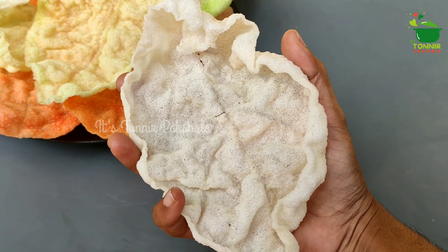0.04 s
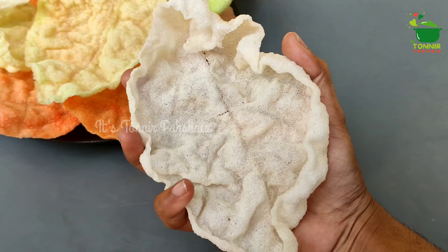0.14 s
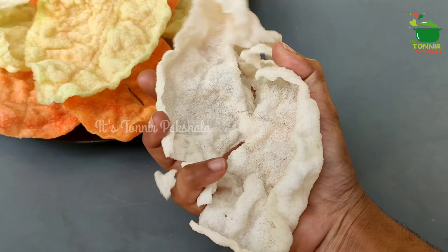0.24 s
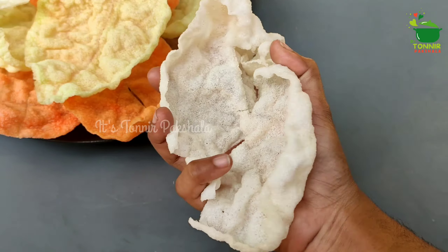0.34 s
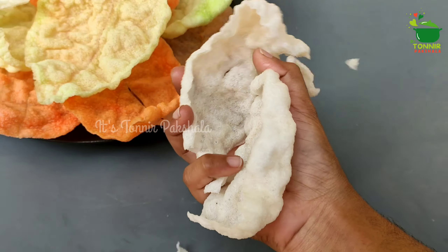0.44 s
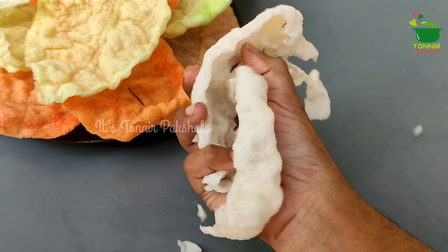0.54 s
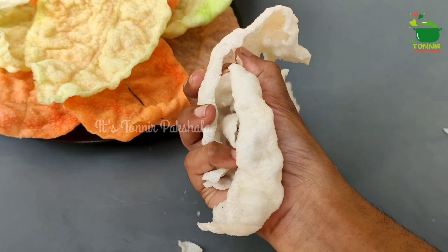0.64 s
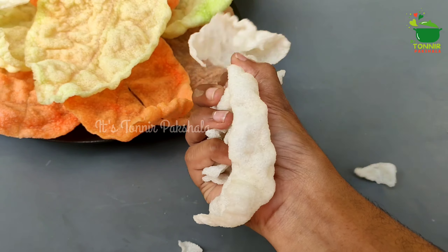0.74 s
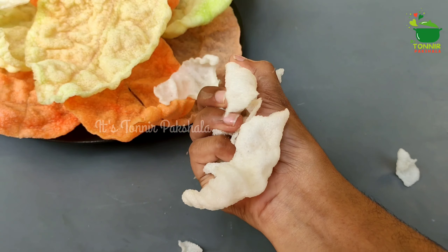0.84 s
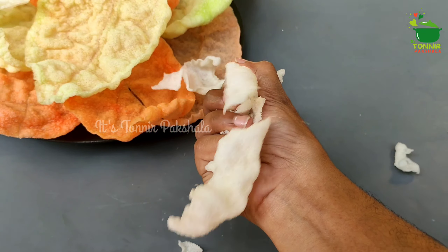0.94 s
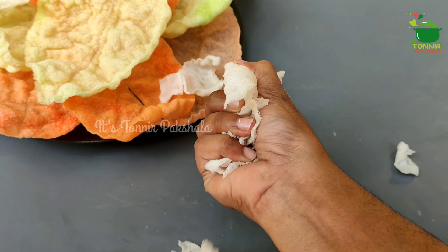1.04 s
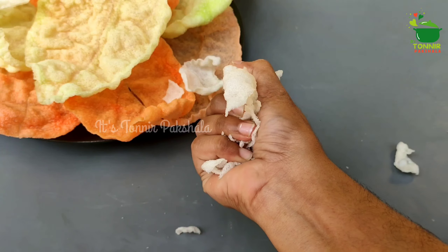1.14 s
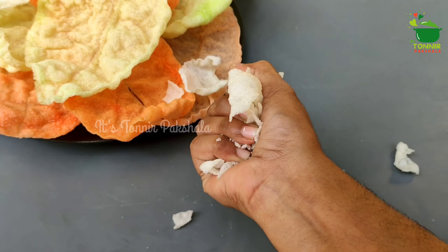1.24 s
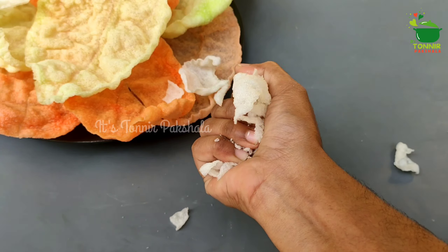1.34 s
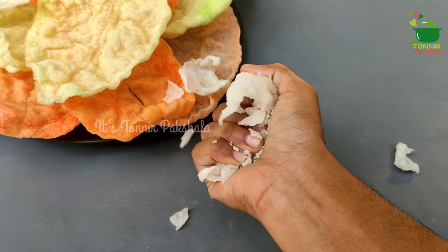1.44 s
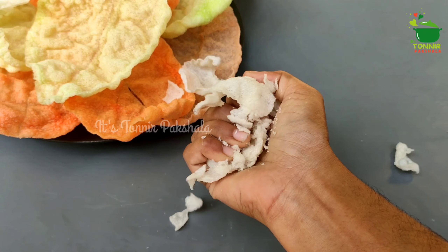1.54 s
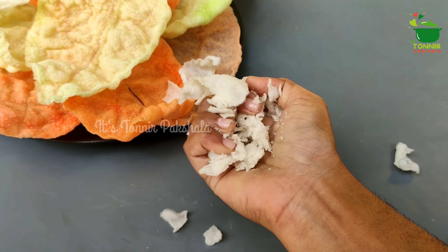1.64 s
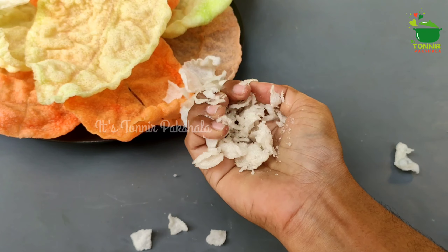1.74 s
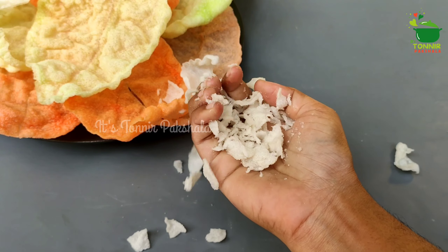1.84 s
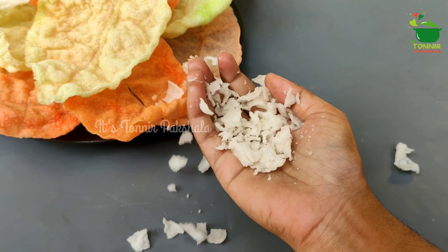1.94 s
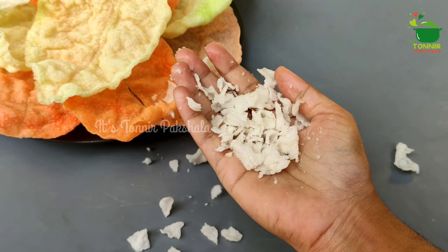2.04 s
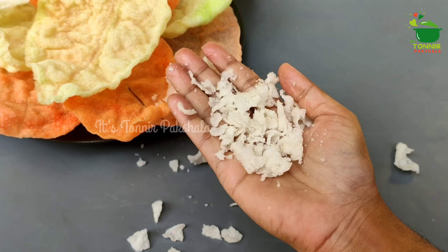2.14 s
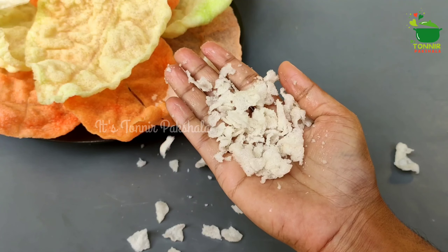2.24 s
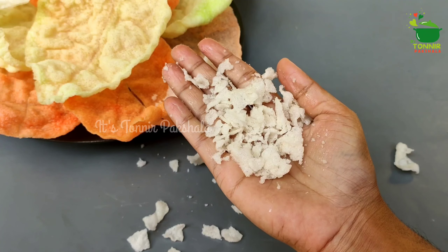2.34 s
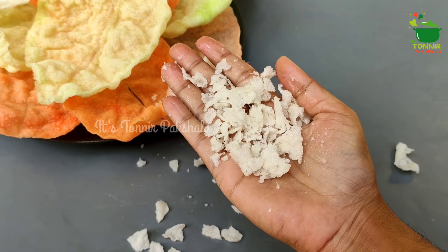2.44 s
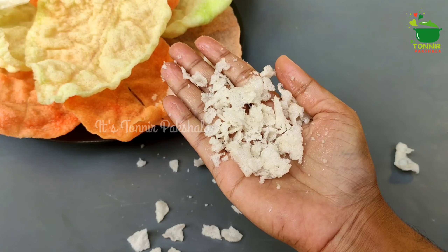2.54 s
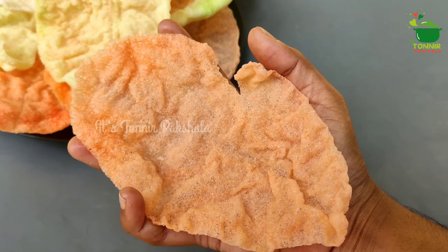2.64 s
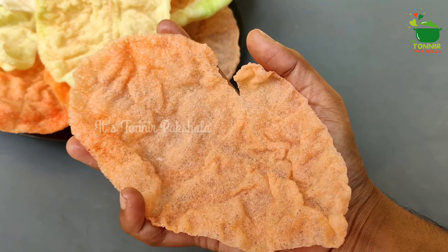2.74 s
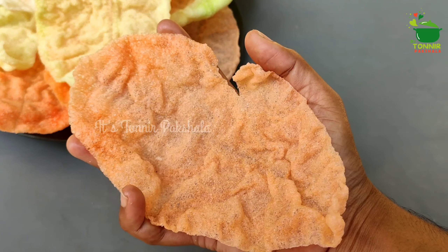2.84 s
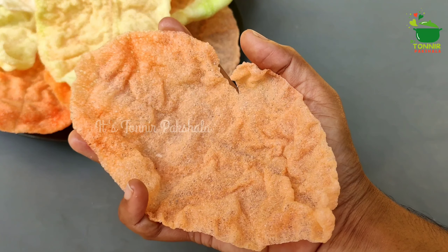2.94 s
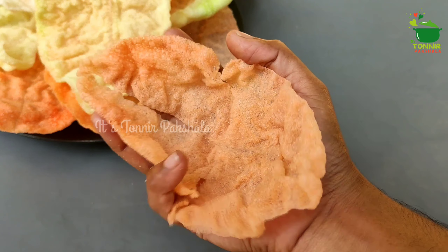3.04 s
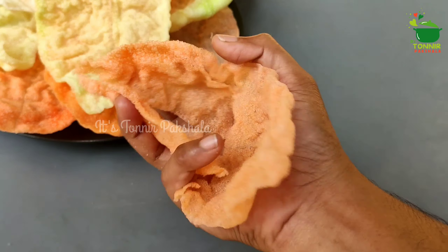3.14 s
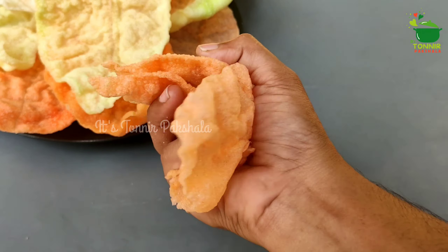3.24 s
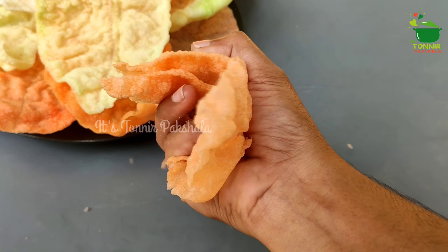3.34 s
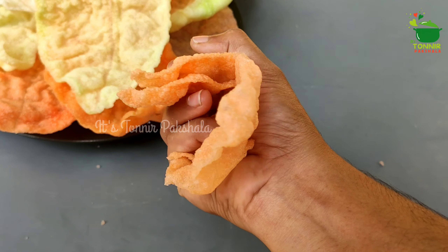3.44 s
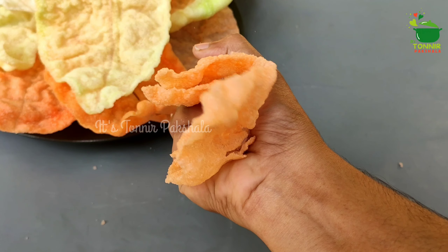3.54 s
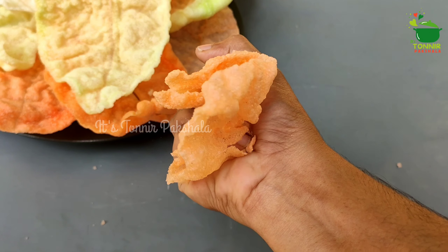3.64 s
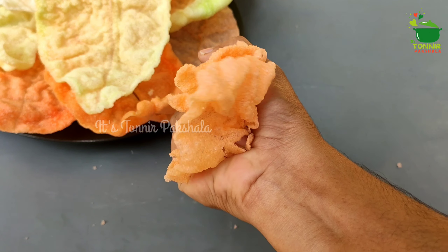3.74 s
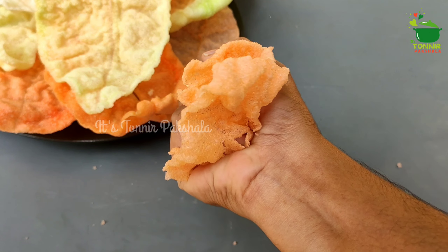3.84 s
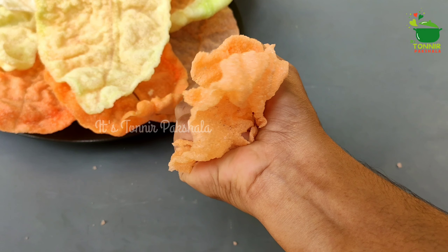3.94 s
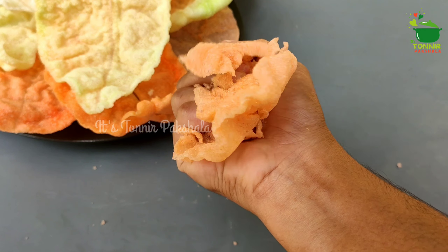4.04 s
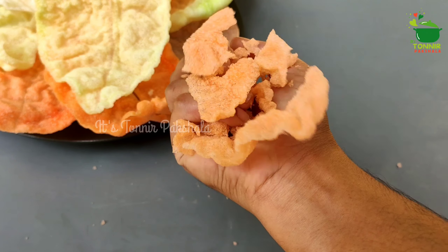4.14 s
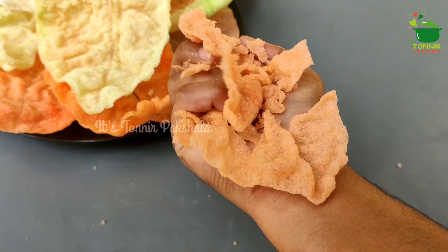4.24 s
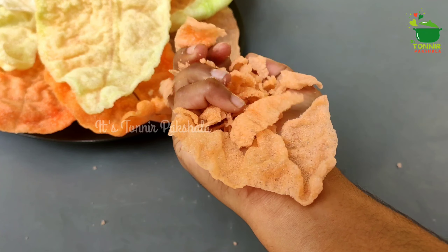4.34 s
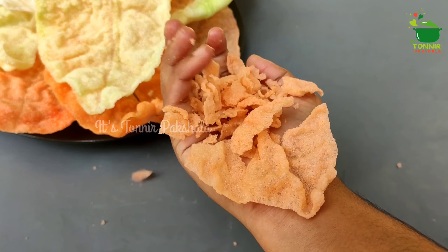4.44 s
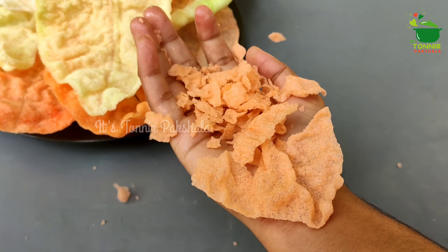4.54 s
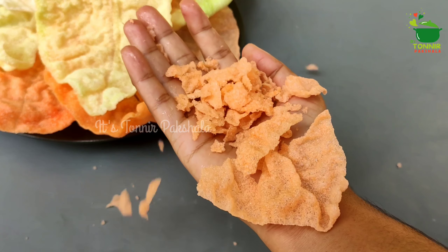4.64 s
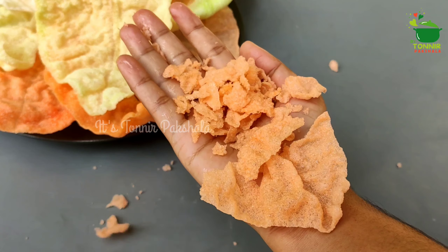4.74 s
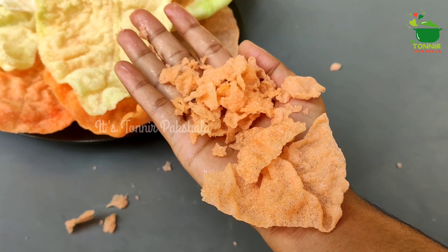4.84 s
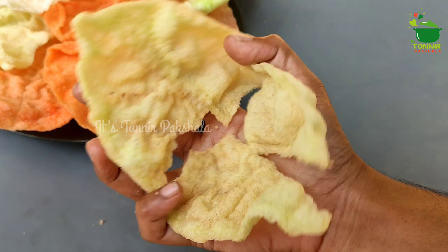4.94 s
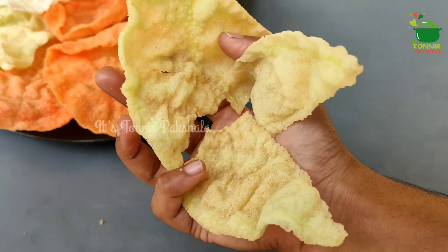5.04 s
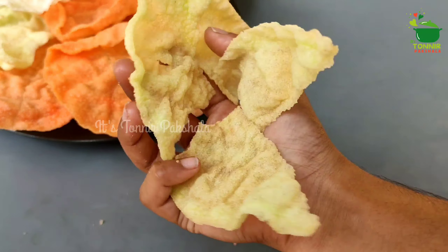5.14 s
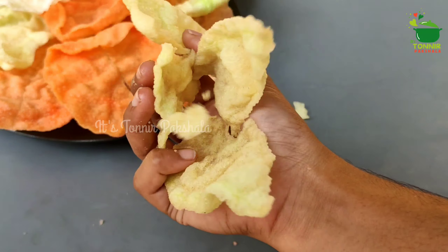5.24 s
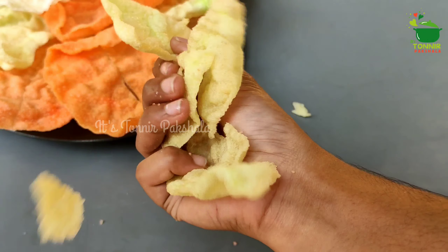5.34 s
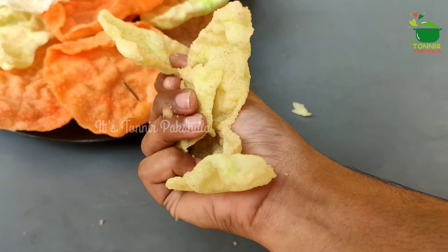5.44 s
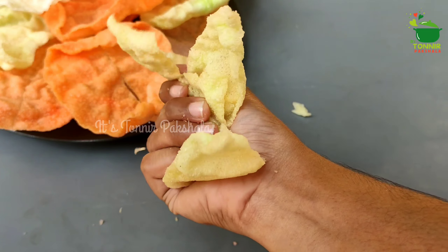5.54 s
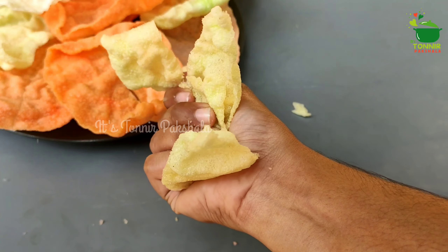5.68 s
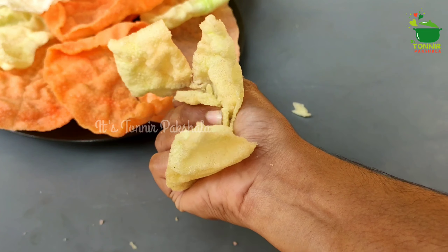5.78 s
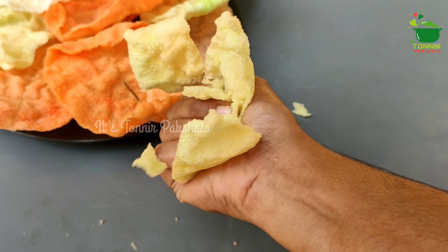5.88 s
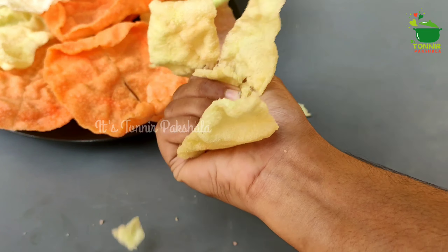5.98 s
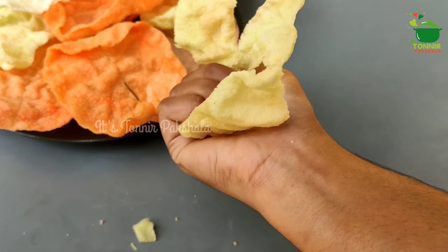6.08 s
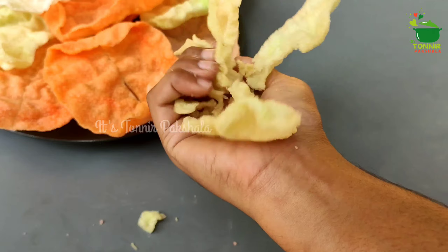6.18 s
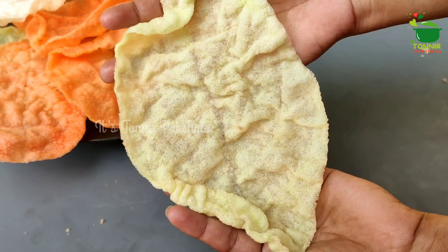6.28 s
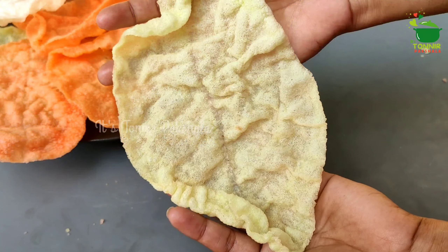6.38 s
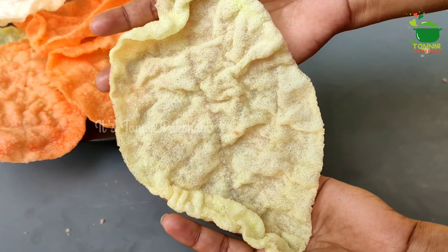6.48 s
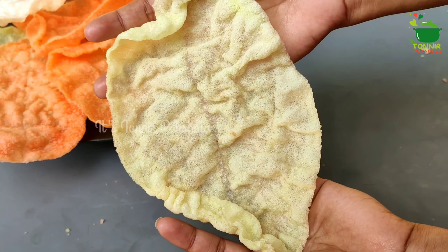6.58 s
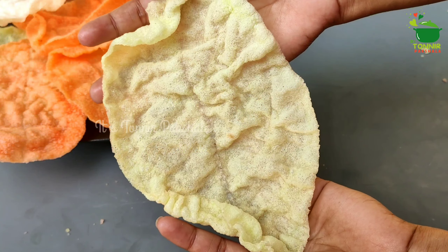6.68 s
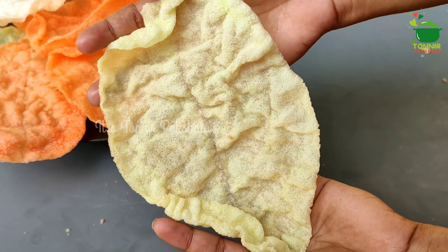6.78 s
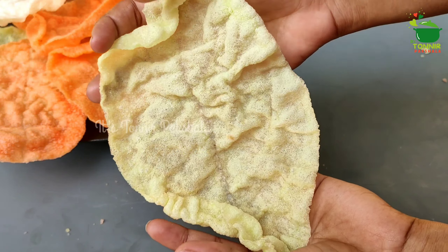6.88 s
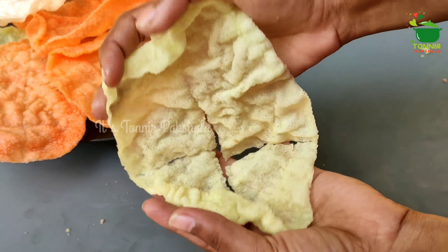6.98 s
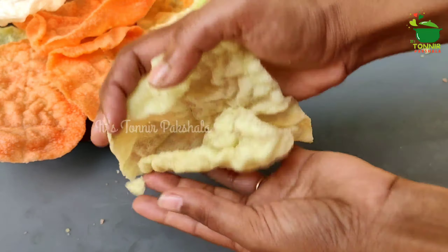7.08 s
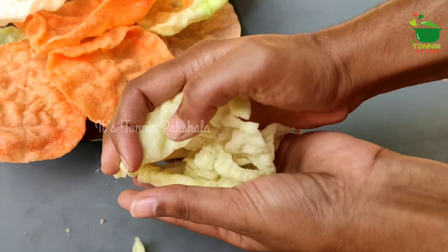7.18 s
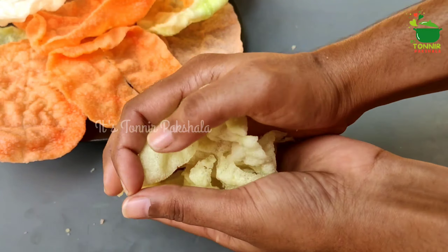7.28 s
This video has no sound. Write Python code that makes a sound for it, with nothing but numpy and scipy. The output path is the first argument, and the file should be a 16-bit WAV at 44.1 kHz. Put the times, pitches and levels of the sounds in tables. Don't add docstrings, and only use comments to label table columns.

```python
import sys
import numpy as np
from scipy import signal
from scipy.fft import rfft, irfft, next_fast_len
from scipy.io import wavfile
from scipy.ndimage import uniform_filter1d, map_coordinates

SR = 44100
rng = np.random.default_rng(int(sys.argv[2]) if len(sys.argv) > 2 else 0)


def decibels_to_gain(level_db):
    exponent = np.asarray(level_db, float) / 20
    return 10 ** exponent


def persist_wave(psi):
    counts = np.round(np.clip(psi, -1, 1) * 32767).astype(np.int16)
    wavfile.write(sys.argv[1], SR, np.atleast_2d(counts).T)


N = 322503

# frequency in Hz, density in dB per Hz.
CRISP = [(80, -8.5), (170, -22), (340, -8), (660, -3.5), (1700, -2), (6200, -2), (6900, -5), (7500, -11.5),
         (14000, -24.5), (16000, -34.5)]


def evened(x):
    return x / np.sqrt(np.mean(x ** 2) + 1e-20)


def read(points, hz):
    f, value = np.transpose(points)
    return np.interp(np.log(hz + 1), np.log(f + 1), value)


def add(mix, s, sound):
    part = mix[:, round(s * SR):][:, :sound.shape[1]]
    part += sound[:, :part.shape[1]]


def causal(points):
    hz = abs(np.fft.fftfreq(4096, 1 / SR))
    log_gain = np.log(decibels_to_gain(np.maximum(read(points, hz), -100)))
    return np.fft.ifft(np.exp(np.conj(signal.hilbert(log_gain)))).real[:2048]


def hiss(points, same):
    size = next_fast_len(N, real=True)
    hz = np.fft.rfftfreq(size, 1 / SR)
    a, b = rfft(rng.standard_normal((2, size)))
    like = np.clip(read(same, hz), -1, 1)
    ports = np.array([a, like * a + np.sqrt(1 - like ** 2) * b])
    return evened(irfft(ports * decibels_to_gain(read(points, hz)), size)[:, :N])


def thirds(x):
    body_hz, top_hz = 1300, 8000
    size = next_fast_len(x.shape[-1], real=True)
    hz, z = np.fft.rfftfreq(size, 1 / SR), rfft(x, size)
    low = 1 / (1 + (hz / body_hz) ** 6)
    high = 1 - 1 / (1 + (hz / top_hz) ** 10)
    thin = 1 - 1 / (1 + (hz / 130) ** 4)
    parts = [irfft(z * share, size)[..., :x.shape[-1]] for share in (low * thin, 1 - low - high, high)]
    return [p / (np.linalg.norm(p, axis=-1, keepdims=True) + 1e-12) for p in parts]


def background():
    # frequency in Hz, density in dB per Hz.
    hush = [(15, -28), (25, -3.5), (114, -8.5), (145, -9), (200, -8.5), (263, -6.5), (420, -7.5),
            (760, -9.5), (1020, -11), (13600, -25), (16000, -24.5)]
    # frequency in Hz, left-right likeness from 0 to 1.
    hush_same = [(40, 0.92), (240, 0.94), (950, 0.11), (15000, 0)]
    # frequency in Hz, density in dB per Hz.
    rumble_colour = [(9, -26), (15, 8.5), (44, -7.5), (85, -19), (390, -20), (800, -40)]
    # time in seconds, level in dB.
    rumble_level = [(0, -58), (1.1, -53), (2.335, -57)]
    at = np.arange(N) / SR
    rumble_db = np.interp(at, *np.transpose(rumble_level), right=-140)
    rumble = hiss(rumble_colour, [(20, .95), (600, .7)])
    cut = rumble_level[-1][0]
    push = decibels_to_gain(-40) * np.exp(np.minimum(at - cut, 0) / .05) * (at < cut)
    hush_db = -64.5 - 3 * np.clip(at - 4, 0, 1)
    return decibels_to_gain(hush_db) * hiss(hush, hush_same) + decibels_to_gain(rumble_db) * rumble + push


def crow():
    # time in seconds, level in dB.
    caws = [
        [(1.6, -63), (1.75, -61), (1.9, -71)],
        [(2.12, -69), (2.37, -59.5), (2.56, -72)],
        [(5.92, -63), (6.1, -60), (6.26, -68)],
        [(6.49, -65), (6.7, -62.5), (6.82, -69)],
    ]
    # frequency in Hz, bandwidth in Hz, level in dB.
    throat = [(935, 45, 0), (1070, 60, -5), (1220, 80, -10)]
    at = np.arange(N) / SR
    turning_points = [s for rows in caws for s in (rows[0][0], rows[-1][0])]
    opening = np.interp(at, turning_points, [.985, 1.03] * len(caws))
    voice = np.zeros((2, N))
    for hz, width, db in throat:
        a, b = signal.lfilter(*signal.butter(2, width / SR), rng.standard_normal((2, 2, N)))
        carrier = np.exp(2j * np.pi * np.cumsum(hz * opening) / SR)
        voice += decibels_to_gain(db) * evened(((a + 1j * b) * carrier).real)
    level = sum(decibels_to_gain(np.interp(at, *np.transpose(rows), left=-140, right=-140)) for rows in caws)
    rasp = decibels_to_gain(2.2 * evened(uniform_filter1d(rng.standard_normal(N), 900)) - 1.5)
    return voice * rasp * uniform_filter1d(level, 900)


def kitchen_reverb(x):
    # frequency in Hz, t60 in seconds.
    decay = [(300, 0.18), (12000, 0.02)]
    taps = np.zeros((2, SR // 2))
    at = np.arange(200, SR // 2 - 20, 20) + rng.integers(0, 20, (2, (SR // 2 - 201) // 20))
    np.put_along_axis(taps, at, rng.choice([-1., 1.], at.shape), 1)
    hz, t, z = signal.stft(taps, SR, nperseg=256)
    tail = signal.istft(z * decibels_to_gain(-60 * t / read(decay, hz)[:, None]), SR, nperseg=256)[1]
    return signal.fftconvolve(x, tail / np.linalg.norm(tail[0]), axes=1)[:, :N]


def drops():
    # start in seconds, peak level in dB.
    landings = [(1.4246, -35), (1.433, -21), (1.4353, -22.5), (1.439, -27), (1.4608, -30), (1.473, -42),
                (1.524, -36), (1.553, -43), (1.577, -36.5), (1.605, -41), (1.629, -43.5), (1.646, -47.5),
                (1.964, -49.5), (1.997, -41.5), (2.032, -46.5), (2.316, -43.5), (4.836, -50)]
    # frequency in Hz, level in dB, t60 in seconds.
    piece = [(278, -3, .1), (340, -6, .07), (430, -3, .05), (495, -2, .055), (570, -5, .04),
             (690, -4, .035), (840, -3, .03), (980, -1, .025), (1800, -14, .015)]
    t, out = np.arange(6000) / SR, np.zeros((2, N))
    hz, db, t60 = np.transpose(piece)[..., None]
    no_bass = signal.butter(4, 245, "high", fs=SR, output="sos")
    draws = rng.random((len(landings), 2, len(piece), 1))
    for (s, peak_db), (weight, detune) in zip(landings, draws):
        swing = np.sin(-2 * np.pi * hz * (1 + 0.15 * (detune - .5)) * t)
        ring = ((.5 + weight) * decibels_to_gain(db - 60 * t / t60) * swing).sum(0)
        ring = signal.sosfilt(no_bass, ring)
        add(out, s, decibels_to_gain(peak_db) * ring / abs(ring).max() * np.ones((2, 1)))
    return out


def ticks():
    # start in seconds, level in dB, ring in Hz, left-right difference in dB.
    early = [(0.1903, -33, 2130, -3), (0.2535, -44.5, 6370.0, 8), (0.2875, -22, 6760.0, 4.5),
             (0.307, -11.3, 6840, 5), (0.3334, -18, 6140, 0.5), (0.4312, -49, 6500.0, 2.4),
             (0.5877, -24.5, 6030.0, 5), (0.6642, -25, 4390.0, 5), (0.6848, -34, 1810.0, -3),
             (0.7226, -27, 2200.0, 2.5), (0.8018, -30, 3420, -1.5), (0.8204, -39, 6240.0, -0.5),
             (0.8391, -34, 6230, -3), (0.9063, -28, 2200.0, -1.3), (0.932, -25.5, 6740, 12),
             (0.9398, -22.5, 4480.0, 4), (0.9662, -26.5, 4330, 0.7), (0.9765, -29, 4530, 6),
             (1.0285, -22.5, 4950.0, -3), (1.1209, -32.3, 4400, 3), (1.1366, -49, 7450.0, 2.8),
             (1.142, -36, 7200, -2), (1.1817, -34.5, 4080, -3), (1.2403, -39.5, 5600, 0.8),
             (1.2516, -28.5, 1720, 0), (1.2627, -42, 5250.0, 2.5), (1.2928, -43.5, 4520.0, 3),
             (1.3617, -48, 4050.0, -2.5), (1.3802, -45, 1520, -2), (1.4859, -34.5, 1210.0, 3),
             (1.4924, -35, 1840, -1), (1.5006, -34, 1810.0, -0.5), (1.5584, -33.5, 4330, 5),
             (1.6263, -38.5, 6500, -7), (1.6872, -45, 4520.0, 1), (1.7906, -49, 3100.0, -0.5),
             (1.8262, -54, 3490.0, -0.5), (1.857, -53, 6630.0, -1.1), (1.8969, -45, 5300, 1.8),
             (1.9061, -52, 6100, 0.6), (1.9722, -49.5, 3750, -3), (1.9851, -46, 5170, 3),
             (1.996, -41.5, 7160, -3), (2.0268, -45, 3700.0, -7), (2.0521, -50, 4910.0, 1),
             (2.0962, -50, 3340, -4.0), (2.0998, -48, 4310.0, -1.7)]
    middle = [(3.0784, -27.5, 5970, 3.5), (3.1902, -19.5, 3250, -8), (3.2372, -28, 4820.0, -4),
              (3.289, -21, 6800, 3), (3.36, -23.5, 3900, 10.5), (3.4588, -27, 3620, 2),
              (3.4996, -45, 5700, 2), (3.599, -22.5, 6680.0, 12), (3.6454, -22, 6740, 3),
              (3.669, -28, 1700, 3), (3.6903, -36, 6590.0, 7), (3.709, -40, 1750, 0),
              (3.7377, -36, 6000, 1), (3.819, -27.5, 6850, 11), (3.8478, -33, 1750, 0.7),
              (3.856, -31, 6800, 5), (3.872, -32, 6500, 7), (3.919, -39, 6600, 2.5), (3.9757, -37, 5330, 2),
              (4.563, -41, 1680.0, -2), (4.5725, -45, 3530.0, -0.5), (4.5863, -49, 3520, -1.8),
              (4.8218, -36, 3800, -6)]
    more_ticks = [(4.9862, -49, 2070.0, -8), (5.1051, -48, 2710.0, 1.7), (5.1471, -46, 5250.0, -1.5),
                  (5.2538, -46, 3700, -0.4), (5.269, -30.5, 6340, 2.1), (5.3265, -42, 5210.0, 7),
                  (5.342, -29, 5650, -1), (5.3566, -35, 5900.0, 1.6), (5.3788, -36, 6200, 0.4),
                  (5.391, -38.0, 3450.0, -7), (5.431, -35, 7240.0, 2.5), (5.4632, -20.5, 4580, -8.5),
                  (5.5, -29, 5000, -6), (5.548, -37.5, 5100, 5), (5.5803, -27.5, 3480, 2.0),
                  (5.63, -27, 2280.0, 7), (5.6351, -30, 1650, 0), (5.662, -28.5, 4390.0, -11),
                  (5.6746, -36, 5040.0, 4), (5.7386, -25.5, 6540, 6), (5.7656, -26, 6370.0, -6),
                  (5.8088, -26, 5800, -0.6), (5.8388, -26.5, 7000, 1.3), (5.877, -34, 6540, -0.5),
                  (5.902, -40, 5380.0, -1), (5.9052, -41, 6240.0, 3.3), (5.9307, -44.5, 3100, -3),
                  (5.937, -45, 3400, -0.5), (5.944, -41, 6100, 2), (5.959, -38, 5170, 2), (6.0303, -44, 3300, -9),
                  (6.15, -45, 4330, 0.8), (7.0587, -25, 6330, 0), (7.089, -15, 4130, 5), (7.1152, -21, 6330, 7.1),
                  (7.1212, -22, 5070, -5), (7.1868, -23.5, 6100, 1), (7.2281, -13, 5800, -3),
                  (7.28, -19, 6400, 0),
                  (5.344, -26.5, 2930, 6), (5.3425, -20.5, 9880, -4), (1.4252, -26.5, 3400, -2),
                (0.7645, -21, 2330, -1), (0.779, -22, 2100, -0.5), (5.289, -25, 1510, -1),
                (0.75, -19.5, 5500, 0), (1.4345, -22, 900, -1), (5.021, -16.5, 2600, 2),
                (5.031, -17, 3200, 0), (7.073, -17, 1100, -0.5)]
    rise_ms, fall_ms, spread, click_db = 0.44, 1, 0.262, -9.5
    ms, out = np.arange(-60, 340) * 1000 / SR, np.zeros((2, N))
    shape = np.where(ms < 0, np.exp(-(ms / rise_ms) ** 2), np.exp(-ms / fall_ms))
    rows, colour = early + middle + more_ticks, causal(CRISP)[:200]
    far_port = np.array([0, 1])[:, None, None]
    for (s, level_db, hz, pan_db), draw in zip(rows, rng.standard_normal((len(rows), 2, 406))):
        near_hz = hz * (1 + spread * np.array([[-1], [0], [1]]) * abs(draw[0, :3, None]))
        unlike = hz / (hz + 1500)
        phase = 2 * draw[0, 3:6, None] + unlike * draw[1, 3:6, None] * far_port
        modes = np.sin(2 * np.pi * near_hz * ms / 1000 + phase)
        ring = (np.array([[.5], [1], [.5]]) * modes).sum(1)
        click = signal.fftconvolve(draw[:, 6:] + draw[:1, 6:], colour[None], "same", axes=1)
        sound = (evened(ring) + decibels_to_gain(click_db) * evened(click)) * shape
        sound -= shape * sound.sum(axis=1, keepdims=True) / shape.sum()
        add(out, s + ms[0] / 1000, decibels_to_gain(level_db - 3.5 + pan_db * np.array([[.5], [-.5]])) * sound)
    return out


def flakes(count, cycles=84.0, longest=0.012, snap=0.28, unlike_hz=1500, lag=4.02):
    t, draw = np.arange(600)[:, None] / SR, rng.random((count, 5, 1, 32))
    hz = 120 + 15800 * ((np.arange(32) + draw[:, 0]) / 32) ** 1.5
    t60 = np.minimum(cycles / hz, longest)
    height = np.sqrt(hz ** 0.7 / t60) * draw[:, 1]
    unlike = hz / (hz + unlike_hz)
    phase = 2 * np.pi * (hz * t + draw[:, 2])
    left = np.sin(phase - 2 * np.pi * hz * lag / SR)
    right = np.sin(phase + 7.65 * unlike * (draw[:, 3] - .5)) * (1 + 2 * unlike * (draw[:, 4] - .5))
    rings = (np.stack([left, right], 1) * (height * decibels_to_gain(-60 * t / t60))[:, None]).sum(-1)
    rings *= np.minimum(t[:, 0] / 0.00029, 1)
    rings /= np.linalg.norm(rings, axis=(1, 2), keepdims=True)
    rings[np.arange(count), 0, rng.integers(5, 11, count)] += snap
    rings[:, 1, 4] += snap
    return signal.oaconvolve(rings, causal(CRISP)[None, None], axes=2)[..., :1200]


def fractures(shape, per_s, spread_db):
    size = decibels_to_gain(spread_db * np.minimum(rng.exponential(1, shape), 4)) * rng.choice([-1, 1], shape)
    return size * (rng.random(shape) < per_s / SR)


def grind():
    # time in seconds, level in dB.
    pressure = [
        [(0.0, -86), (0.27, -50.5), (0.41, -52.5), (0.6, -39.5), (1.15, -45.5), (1.6, -48), (1.8, -57),
         (2.3, -64), (2.6, -68.5)],
        [(2.75, -65.5), (2.85, -52.5), (3.0, -61), (3.22, -42.5), (3.4, -46.5), (3.55, -50), (3.9, -46.5),
         (4.15, -63.5), (4.55, -53)],
        [(4.95, -64), (5.1, -55), (5.2, -61.5), (5.32, -47), (5.5, -49.5), (5.7, -45), (5.97, -56.5),
         (6.0, -57), (6.24, -58.5), (6.3, -68), (6.37, -68), (6.39, -62), (6.45, -76)],
        [(7.01, -83), (7.1, -55), (7.3, -43)],
    ]
    rings, pick = flakes(count=16, cycles=110.0), rng.integers(0, 16, N)
    clumps = decibels_to_gain(1.9 * evened(uniform_filter1d(rng.standard_normal(N), 500)))
    level_db = np.interp(np.arange(N) / SR, *np.concatenate(pressure).T)
    ticking = np.clip((level_db + 70) / 8, 1.5, 2.2)
    slips = fractures(N, 5000, 1.8) * clumps + ticking * fractures(N, 60, 2.5)
    turns = decibels_to_gain(5 * rng.standard_normal((16, 400)))
    turns /= np.sqrt((turns ** 2).mean(0))
    turns = map_coordinates(turns, [pick, np.arange(N) * 399 / N], order=1)
    sound = np.zeros((2, N))
    for k, ring in enumerate(rings):
        sound += signal.oaconvolve((slips * turns * (pick == k))[None], ring, axes=1)[:, :N]
    z = rfft(sound)
    colour = decibels_to_gain(read(CRISP, np.fft.rfftfreq(N, 1 / SR)))
    even = colour / np.sqrt(uniform_filter1d(abs(z) ** 2, size=2500))
    body, middle, top = thirds(irfft(z * even, N))
    body_db = -15.0 - 0.05 * (level_db + 58)
    top_db = -8.5 + 0.29 * (level_db + 51.5)
    return decibels_to_gain(level_db) * np.sqrt(N) * (middle + decibels_to_gain(body_db) * body + decibels_to_gain(top_db) * top)


def breaks(rows, rings, size, count, per_s, crack):
    ms, out = (np.arange(2 * size) - size) * 1000 / SR, np.zeros((2, N))
    s, level_db, body_db, spread_ms, top_db = np.transpose(rows)[..., None, None]
    slips = fractures((len(rows), count, 2 * size), per_s, 2.2)
    slips[:, 0, size] = crack
    spread_ms = np.maximum(spread_ms, .4)
    lopsided = np.where(ms < 0, 1.3, .75)
    volleys = slips * np.exp(-(ms / (2 * lopsided * spread_ms)) ** 2)
    heard = rings[rng.integers(0, len(rings), (len(rows), count))]
    body, middle, top = thirds(signal.fftconvolve(volleys[:, :, None], heard, axes=3).sum(1))
    energy = np.sqrt(2 * np.pi) * spread_ms * SR / 1000
    sounds = decibels_to_gain(level_db) * np.sqrt(energy) * (middle + decibels_to_gain(body_db) * body + decibels_to_gain(top_db) * top)
    for start, sound in zip(s.ravel(), sounds):
        add(out, start - .0003 - size / SR, sound)
    return out


def with_top(tables, top_db):
    wafer_top_db = [-0.23, -0.28, 0.99, 0.86]
    rows = np.concatenate(tables)
    brittle_db = np.repeat(wafer_top_db, [len(table) for table in tables])
    lighter_db = -0.12 * (rows[:, 1] + 30) - 0.098 * (rows[:, 2] + 15)
    scatter_db = 2 * rng.standard_normal(len(rows))
    return np.c_[rows, top_db + brittle_db + lighter_db + scatter_db]


def wafers():
    # start in seconds, level in dB,
    # body in dB re level.
    white = [(0.175, -43, -13.5), (0.191, -42, -16), (0.203, -40, -10.5), (0.268, -28, -17.5),
             (0.275, -29, -19), (0.2875, -40, -22), (0.303, -17.5, -13), (0.307, -21, -8),
             (0.313, -24, -4.5), (0.334, -30.5, 1.5), (0.349, -26.5, -6), (0.451, -37.5, -21),
             (0.5045, -23.5, -16.5), (0.546, -26, -4), (0.556, -31.5, -5.5), (0.565, -39.5, 5),
             (0.588, -37.5, 2), (0.614, -30.5, -13.5), (0.638, -36, -3.5), (0.664, -24, -13),
             (0.699, -22.5, -16), (0.765, -19, -22.5), (0.797, -31, -33), (0.84, -34.5, -27),
             (1.021, -33, -49), (1.057, -48, -23), (1.121, -37.5, -31), (1.142, -32.5, -30),
             (1.193, -33.5, -12),
             (1.424, -35, -14), (1.434, -35.5, 0), (1.558, -52, 5), (1.755, -48, -31), (1.86, -44, -10),
              (1.896, -48.5, -10), (2.0, -44, -25), (2.052, -49.5, -15), (2.078, -55.5, -11)]
    orange = [(3.04, -40, -5.5), (3.07, -34.5, -14.5), (3.077, -37, -15), (3.103, -20, -12),
              (3.107, -28.5, -25), (3.134, -20.5, -12), (3.164, -31, -3.5), (3.190, -29, -5),
              (3.193, -25, -33), (3.204, -25, -22), (3.2473, -27, -10.5), (3.255, -32, -0.5),
              (3.266, -42, -1), (3.361, -27.5, -15), (3.366, -24.5, -14), (3.469, -36, -29),
              (3.489, -32, -16.5), (3.526, -26.5, -22), (3.554, -33, -41), (3.587, -40, -24.5),
              (3.603, -40, -21), (3.663, -58, -28), (3.67, -31, -18), (3.736, -42, -20), (3.771, -40, -34),
              (3.818, -44, -26.5), (3.885, -31, -25.5), (3.898, -42, -17), (4.822, -44.5, -11),
              (4.903, -46.5, -11),
              (4.049, -42.5, -26), (4.172, -49, -4), (4.19, -50, -12), (4.351, -50, -10), (4.567, -52, 5),
                (4.788, -50, -14), (4.937, -57, -4), (4.987, -54, -23)]
    yellow = [(5.014, -27.5, -2), (5.156, -42, -13), (5.225, -42, -24), (5.236, -39, -12),
              (5.261, -39, -21), (5.27, -38, -19), (5.289, -27, -12.5), (5.302, -35.5, -6),
              (5.3425, -32, -22), (5.354, -47, 3), (5.441, -27, -21), (5.449, -28, -30), (5.466, -31, -30),
              (5.5, -44, -11), (5.5098, -27, -27), (5.583, -40.5, -36), (5.595, -34, -23),
              (5.598, -27, -21), (5.664, -37, -27), (5.694, -31, -14.5), (5.718, -27.5, -23),
              (5.736, -32, -9.5), (5.768, -47, -21), (5.811, -34.5, -18), (5.835, -34.5, -13),
              (5.879, -39, -7), (6.023, -44.5, -32), (6.15, -40.5, -13), (6.221, -49.5, -30)]
    last = [(7.051, -26, -10), (7.059, -36, -20), (7.0707, -18.5, -7.5), (7.09, -22, -18),
            (7.094, -24, -16.5), (7.132, -20.5, -13.5), (7.221, -18.5, -14), (7.232, -19.5, -23.5),
            (7.253, -17.5, -16.5), (7.259, -32, -4.5), (7.282, -32, -38), (7.297, -25, -22)]
    # middle of the swell in seconds, level in dB, body in dB re
    # level, spread in ms.
    white_crunch = [(0.308, -28, -14, 4.4), (0.337, -25.5, -20, 13.5), (0.471, -37, -15, 4),
                    (0.503, -26.5, -20, 6.1), (0.604, -30.5, -13, 7.4), (0.653, -23, -20, 3),
                    (0.697, -28.5, -10, 5.6), (0.775, -26, -12, 6.9), (0.91, -37, -16, 9.7),
                    (0.936, -30.5, -22.5, 9.3), (0.97, -45, -27, 10), (1.023, -38, -38, 3.9),
                    (1.06, -38, -23, 14), (1.247, -38.5, -32, 11.6)]
    orange_crunch = [(2.84, -56.5, -4, 40), (3.129, -25.5, -12, 6.6), (3.152, -32, -5, 4.2),
                     (3.198, -37, -14, 10.6), (3.286, -30, -8.5, 6.9), (3.311, -35.5, -17, 9.2),
                     (3.328, -30, -8.5, 5.5), (3.353, -28.5, -20, 10.4), (3.454, -31, -18, 9.8),
                     (3.557, -38, -21.5, 48), (3.595, -26.5, -27, 4.5), (3.641, -30.5, -23.5, 13),
                     (3.809, -35.5, -55, 7.2), (3.861, -33.5, -19.5, 11.3), (3.968, -39, -19, 12),
                     (4.027, -48, -18, 27), (4.175, -56.5, -13, 32), (4.585, -56.5, -2.5, 26)]
    yellow_crunch = [(5.024, -24, -16.5, 8.2), (5.055, -41.5, -5, 8.2), (5.281, -45, -9, 13),
                     (5.473, -39.5, -45, 16.6), (5.622, -33.5, -26, 11), (5.661, -35, -13, 6.6),
                     (5.747, -40.5, -54.5, 22.5), (5.82, -36.5, -40, 8), (5.857, -41, -17.5, 13),
                     (5.941, -48.5, -25, 23)]
    last_crunch = [(7.037, -53.5, -16.5, 6.7), (7.08, -21.5, -11, 4.8), (7.114, -33.5, -17, 11),
                   (7.171, -42.5, -7, 7.5), (7.194, -35.5, -13, 4.2), (7.236, -28, -22, 14.4),
                   (7.271, -32.5, -23, 4.7)]
    # start in seconds, level in dB.
    flying = [(0.268, -29), (0.3025, -25), (0.307, -17), (0.666, -25), (1.021, -20), (2.334, -42),
              (3.556, -20.5), (5.44, -28), (5.511, -25), (7.0675, -35)]
    rings = flakes(count=90)
    snaps = with_top([white, orange, yellow, last], top_db=-12.5)
    snaps = np.insert(snaps, 3, 0.89, axis=1)
    crunches = with_top([white_crunch, orange_crunch, yellow_crunch, last_crunch], top_db=-9)
    splinters = [(*row, -12, .4, -7) for row in flying]
    return (breaks(snaps, rings, size=424, count=2, per_s=1500, crack=3.2)
            + breaks(splinters, flakes(count=9, snap=.6), size=424, count=1, per_s=300, crack=4)
            + breaks(crunches, rings, size=3400, count=6, per_s=300, crack=2))


def scene():
    near = wafers() + grind() + drops() + ticks()
    wet = decibels_to_gain(-18.5) * kitchen_reverb(near)
    return near + wet + crow() + background()


def low_pass(x):
    return signal.sosfilt(signal.butter(12, 16300, fs=SR, output="sos"), x)


def record(dry):
    return low_pass(dry)


dry = scene()
out = record(dry)
persist_wave(out)
```